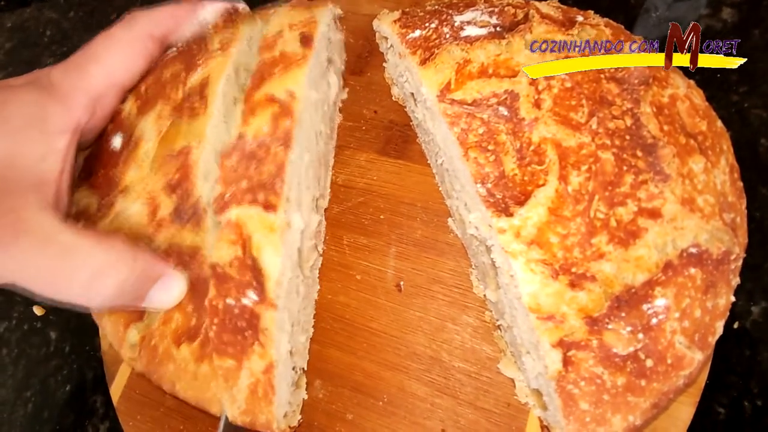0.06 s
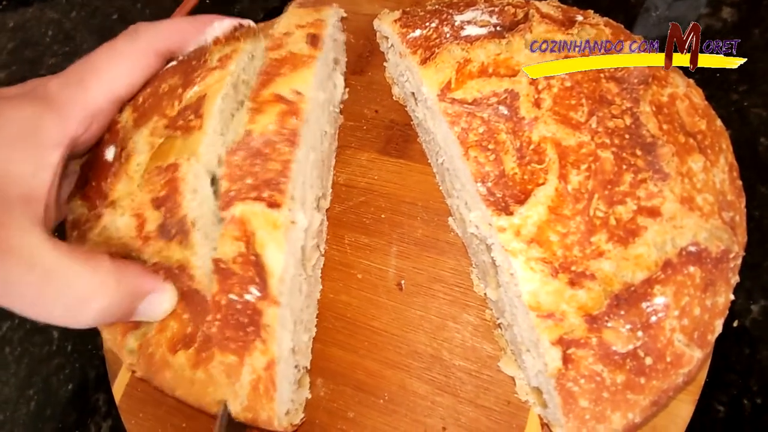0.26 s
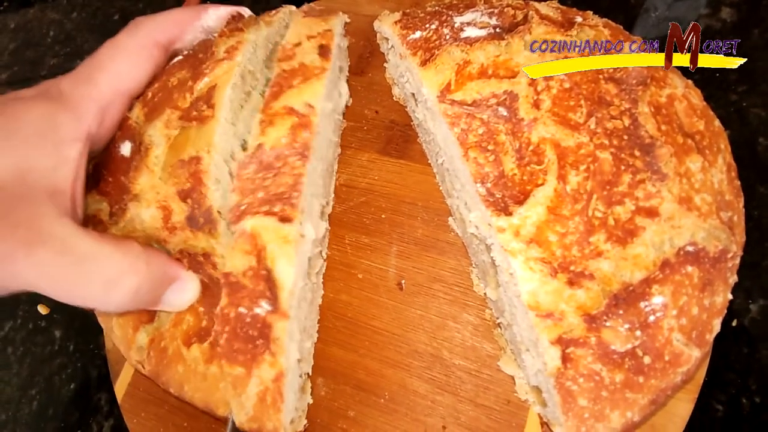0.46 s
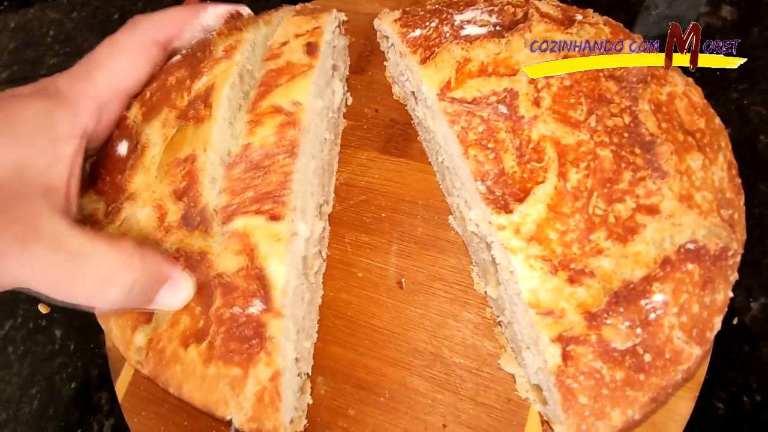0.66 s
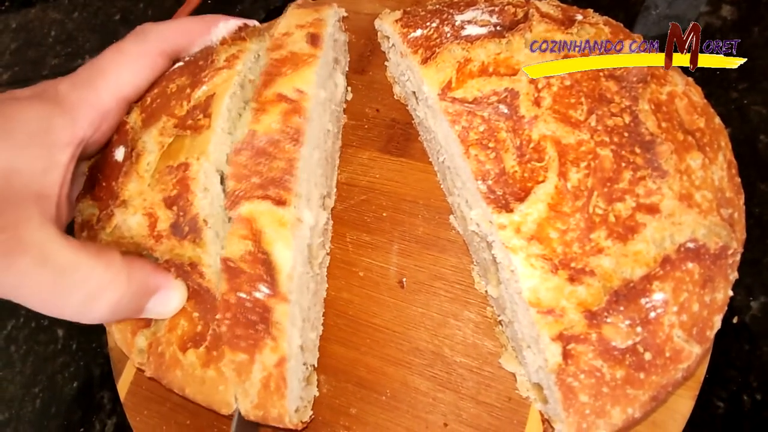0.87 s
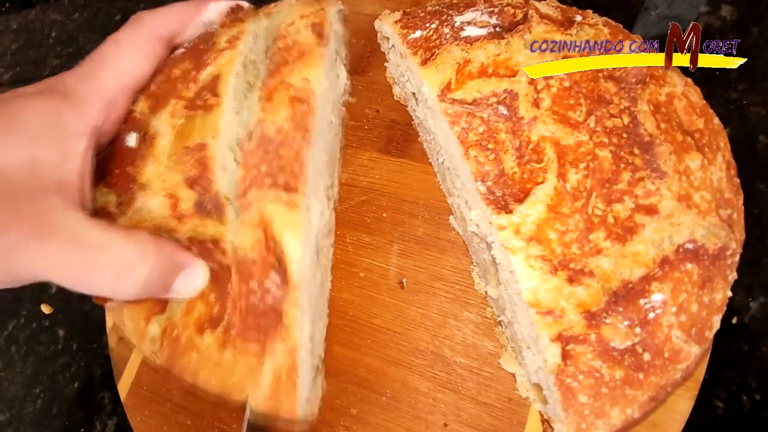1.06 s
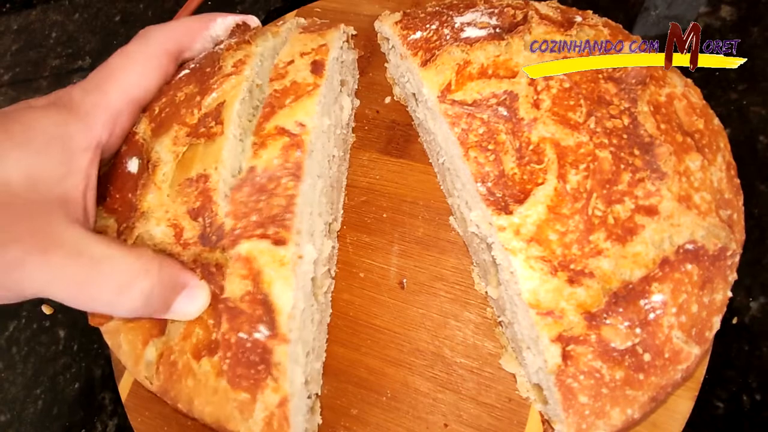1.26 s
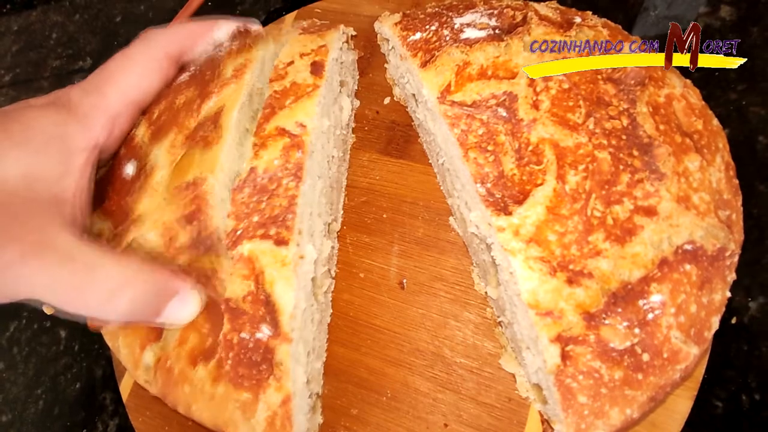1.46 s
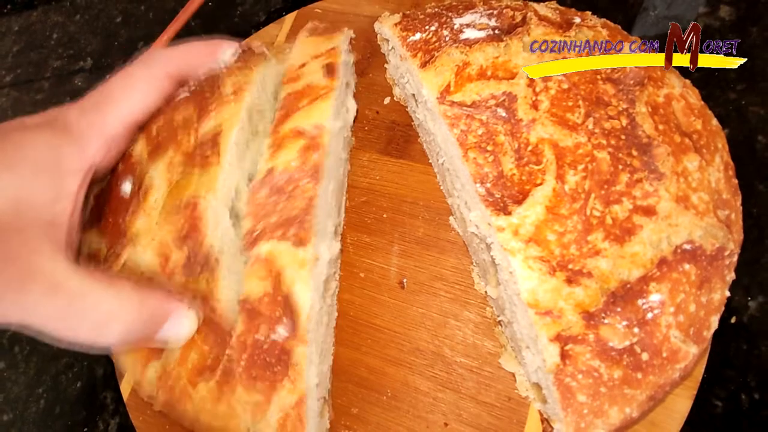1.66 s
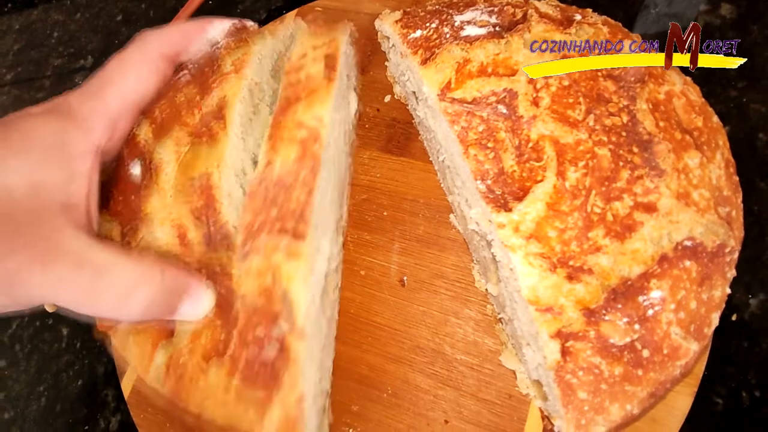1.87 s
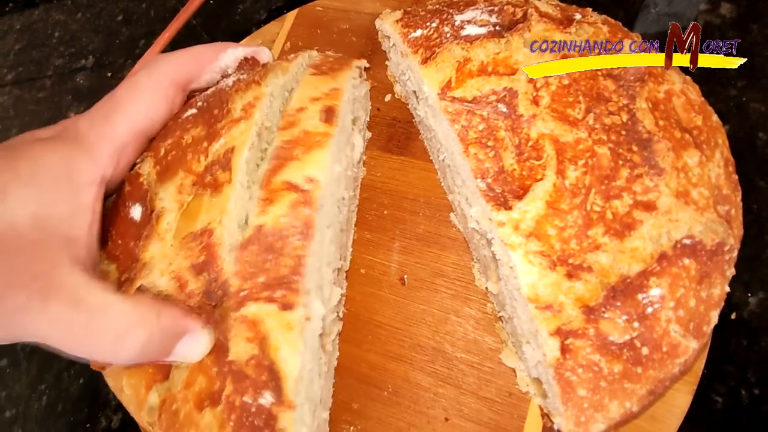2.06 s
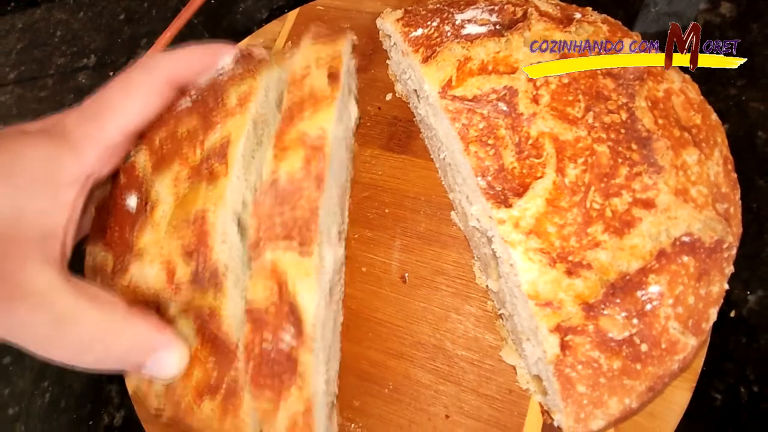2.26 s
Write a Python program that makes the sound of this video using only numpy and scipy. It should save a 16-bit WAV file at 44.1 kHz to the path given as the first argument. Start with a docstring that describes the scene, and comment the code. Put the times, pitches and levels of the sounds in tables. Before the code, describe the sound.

A serrated bread knife saws a crusty loaf on a wooden board, about four strokes a second, each gritty rasp swelling and fading. Sharp bright crust snaps cluster at 0.2-0.7 s and again around 1.15-1.3 s, then thin out. Woody knocks and dull counter thuds sit underneath, stronger near 0.3 and 1.65 s. A dry tick at 1.85 s precedes a strong rasp. Close, small kitchen, low rumble and faint hiss.

```python
"""Small kitchen, two close microphone ports: a serrated knife saws a crusty loaf on a wooden board.
Rasp: dense random clicks and flakes, coloured as crust and crumb, swelling with each stroke.
Snaps: decaying noise bursts with gritty tails. Tooth jolts drive board and counter resonances.
One dry tick as the blade catches; steady shaped noise for room rumble and hiss."""
import sys
import numpy as np
from scipy import signal
from scipy.fft import rfft, irfft
from scipy.io import wavfile
from scipy.ndimage import uniform_filter1d

SR = 44100
rng = np.random.default_rng(int(sys.argv[2]) if len(sys.argv) > 2 else 0)


def rack_gain(trim_db):
    """Turn a fader trim in dB into the linear factor to multiply a signal by."""
    fader = np.asarray(trim_db, float)
    return 10 ** (fader / 20)


def master_out(mix):
    """Clip the mix to full scale and print it as 16-bit PCM to the path in sys.argv[1]."""
    frames = np.transpose(np.atleast_2d(mix))
    ceiling = np.clip(frames, -1, 1)
    pcm = np.round(ceiling * 32767).astype(np.int16)
    wavfile.write(sys.argv[1], SR, pcm)


N = 101430
T = np.arange(N) / SR
# power fraction common to both ports
ALIKE, BOARD_ALIKE, SNAP_ALIKE = 0.083, 0.68, 0.55


def colour(x, points):
    """Shapes a spectrum by (frequency [Hz], gain [dB]) points, interpolated over log frequency."""
    hz, db = np.array(points, float).T
    f = np.fft.rfftfreq(x.shape[-1], 1 / SR) + 1
    gain = rack_gain(np.interp(np.log(f), np.log(hz), db))
    return irfft(rfft(x) * gain, x.shape[-1])


def unit(x):
    """Scales to rms 1."""
    return x / np.sqrt(np.mean(x ** 2))


def pair(shape, alike):
    """Two noises, one per port, sharing the power fraction alike."""
    a = np.clip(alike, 0, 1)
    n = rng.standard_normal((3,) + shape)
    return np.sqrt(a) * n[0] + np.sqrt(1 - a) * n[1:]


def band(x, hz, width_hz):
    """Resonance of gain 1 at its centre."""
    b, a = signal.iirpeak(min(hz, .45 * SR), hz / width_hz, fs=SR)
    return signal.lfilter(b, a, x)


def ring(x, modes):
    """Sum of decaying modes of alternating sign, driven by x."""
    out = 0
    for k, (hz, db, t60) in enumerate(modes):
        out = out + (-1) ** k * rack_gain(db) * band(x, hz, 1.8 / max(t60, .001))
    return out


def kicks(per_s, spread_db):
    """Random clicks, mostly small and a few large."""
    return (rng.random(N) < per_s / SR) * rack_gain(spread_db * rng.exponential(size=N))


# saw strokes: (start [s], fastest [s], end [s], rasp level [dB], board level [dB], counter level [dB])
SAW_STROKES = [(-.1, 0.023, 0.18, -42, -50, -41.5), (0.142, 0.273, 0.44, -40, -33.5, -39.5),
               (0.363, 0.542, 0.78, -37, -46.5, -43.5), (0.726, 0.887, 1.126, -41, -41.5, -37),
               (1.073, 1.147, 1.391, -35, -46.5, -44.5), (1.322, 1.423, 1.54, -41.5, -46.5, -41.5),
               (1.525, 1.648, 1.8164, -36.5, -35.5, -35.5), (1.851, 1.932, 2.103, -32, -42, -49),
               (2.088, 2.165, 2.335, -42.5, -46, -61)]


def swell(level_db, point, late_s=0.):
    """The blade speeds up and slows down once a stroke; higher point = more peaked."""
    out = 0
    for (start, fastest, end, *_), db in zip(SAW_STROKES, level_db):
        speed = np.sin(np.pi / 2 * np.interp(T - late_s, [start, fastest, end], [0, 1, 0]))
        out = out + rack_gain(db) * speed ** point
    return out


# room noise spectrum: (frequency [Hz], relative density [dB per Hz])
KITCHEN_SPECTRUM = [(12, -31), (20, 6.5), (194, -7.5), (611, -32), (2270, -30), (3920, -28), (6780, -23.5),
                    (13800, -33.5)]
KITCHEN_DB = -43.5


def kitchen():
    """Steady room rumble and hiss: shaped noise, independent at each port."""
    return rack_gain(KITCHEN_DB) * unit(colour(rng.standard_normal((2, N)), KITCHEN_SPECTRUM))


RASP_POINT = 1.49
CRUMB_DB = -1  # over the mean of rasp and board levels
GRAINS_PER_S, GRAIN_SPREAD_DB, CRUMB_SPREAD_DB = 13000, 1.5, 2.6
FLAKES_PER_S, FLAKE_SPREAD_DB, FLAKE_DECAY_S, FLAKE_DB = 260, 4.2, 0.0011, -5
FLICKER_PER_S, FLICKER_DB = 60, 2.5  # flicker spread before smoothing
# crust spectrum: (frequency [Hz], relative density [dB per Hz])
CRUST_SPECTRUM = [(900, -35), (1500, -13), (3700, -8.5), (4500, -8.5), (7300, -11.5), (9100, 2),
                  (10300, -8), (12200, -2.5), (14000, -22.5)]
# crumb spectrum: (frequency [Hz], relative density [dB per Hz])
CRUMB_SPECTRUM = [(590, -1), (1000, -5.5), (1450, -8.5), (2240, -1), (3860, -5.5), (4400, -11),
                  (7000, -3.5), (9100, -2), (15400, -120)]


def rasp():
    """Teeth bite unevenly: bright grains and small flakes from the crust, duller grains from the crumb."""
    hold = int(SR / FLICKER_PER_S)
    flicker = rng.standard_normal((2, N // 200)).repeat(hold, axis=1)[:, :N]
    bite = rack_gain(FLICKER_DB * uniform_filter1d(flicker, hold // 2))
    crust_grains = kicks(GRAINS_PER_S, GRAIN_SPREAD_DB) * pair((N,), ALIKE)
    crumb_grains = kicks(GRAINS_PER_S, CRUMB_SPREAD_DB) * pair((N,), ALIKE)
    flake_decay = [1, -np.exp(-1 / (FLAKE_DECAY_S * SR))]
    flakes = signal.lfilter([1], flake_decay, kicks(FLAKES_PER_S, FLAKE_SPREAD_DB)) * pair((N,), ALIKE)
    crust = unit(colour(crust_grains, CRUST_SPECTRUM))
    crust = crust + rack_gain(FLAKE_DB) * unit(colour(flakes, CRUST_SPECTRUM))
    crumb = unit(colour(crumb_grains, CRUMB_SPECTRUM))
    rasp_db, board_db = np.array(SAW_STROKES).T[3:5]
    crust_load = bite[0] * swell(rasp_db, RASP_POINT)
    crumb_load = np.sqrt(bite[0]) * bite[1] * swell((rasp_db + board_db) / 2 + CRUMB_DB, RASP_POINT)
    return crust_load * crust + crumb_load * crumb


TEETH_PER_S, TOOTH_SPREAD_DB = 140, 5.5
BOARD_POINT, COUNTER_LATE_S = 4.27, 0.015
DRAG_POINT, BOARD_DRAG_DB = 0.17, -18.5  # lighter rubbing all along a stroke
# board modes: (frequency [Hz], level [dB], nominal t60 [s])
BOARD_MODES = [(293, -7.5, 0.029), (455, -6, 0.043), (506.5, 0.5, 0.061), (602, -0.5, 0.041),
               (701, -4, 0.033), (781.5, -3, 0.048), (943.5, 0, 0.037), (1050, -3, 0.016),
               (1195, -5, 0.008)]
# counter modes: (frequency [Hz], level [dB], nominal t60 [s])
COUNTER_MODES = [(101, 3, 0.19), (146.6, 3, 0.15), (187.3, -6.5, 0.048)]


def board():
    """Uneven tooth jolts ring the board; the counter below thuds a little later."""
    pace = rng.gamma(6, 1 / 6, N // 64 + 1).repeat(64)[:N]
    phase = np.cumsum(TEETH_PER_S / SR * pace)
    teeth = np.diff(np.floor(phase), prepend=0) * rack_gain(TOOTH_SPREAD_DB * rng.standard_normal(N))
    jolts = 0.72 * unit(teeth) + pair((N,), BOARD_ALIKE)

    def rung(push, modes):
        """Driven modes, scaled by the rms of the evenly driven ring."""
        return ring(jolts * push, modes) / np.sqrt(np.mean(ring(jolts, modes) ** 2))

    board_db, counter_db = np.array(SAW_STROKES).T[4:6]
    load = swell(board_db, BOARD_POINT) + swell(board_db + BOARD_DRAG_DB, DRAG_POINT)
    thud = swell(counter_db, BOARD_POINT, COUNTER_LATE_S)
    return rung(load, BOARD_MODES) + rung(thud, COUNTER_MODES)


SNAP_HZ, SNAP_SCATTER, SNAP_WIDTH_HZ = 9230, 0.047, 1600  # scatter: relative
CRACK_HZ, CRACK_WIDTH_HZ, SNAP_ABOVE_HZ = 4080, 4200, 2660
SNAP_DECAY_S, SNAP_RISE_S = 0.0012, 0.0003
SNAP_DB, SNAP_BROAD_DB, SNAP_TAIL_DB, GRIT_DB = -2, -9, -12, 3.5
# flake snaps: (time [s], level before SNAP_DB [dB], deeper crack gain [dB], tail decay [s])
FLAKE_SNAPS = [(0.025, -47, -12, 0.006), (0.183, -24.5, -10, 0.048), (0.2116, -17, -24, 0.006),
               (0.2395, -22, -21, 0.01), (0.2638, -15, -29, 0.0072), (0.267, -16.5, -30, 0.015),
               (0.3278, -9.5, -26, 0.0036), (0.3307, -7, -24, 0.0058), (0.3322, -12.5, -25, 0.024),
               (0.404, -30.5, -26, 0.009), (0.4632, -23.5, -7, 0.016), (0.478, -23, -14, 0.006),
               (0.4965, -12.5, -40, 0.004), (0.5096, -15.5, -29, 0.0095), (0.5208, -17.5, -28, 0.011),
               (0.5282, -10, -32, 0.0064), (0.5344, -11, -37, 0.0055), (0.5366, -11, -34, 0.04),
               (0.566, -13, -30, 0.0056), (0.61, -14, -30, 0.015), (0.622, -16, -32, 0.016),
               (0.699, -19.5, -43, 0.014), (0.8251, -22, -9, 0.045), (1.0457, -34, -22, 0.0027),
               (1.077, -31, -13, 0.004), (1.101, -28, -10, 0.0092), (1.141, -21.5, -23, 0.034),
               (1.1457, -21, -34, 0.014), (1.1477, -12, -18, 0.014), (1.161, -7.5, -36, 0.017),
               (1.2501, -12, -15.5, 0.003), (1.269, -19, -31, 0.008), (1.2724, -19.5, -29, 0.0046),
               (1.309, -20.5, -13, 0.0079), (1.4082, -23.5, -7.5, 0.024), (1.5344, -31.5, -2, 0.043),
               (1.8527, -30, -8, 0.01), (1.8935, -20, -17, 0.0019), (2.0103, -29, -6, 0.007),
               (2.1162, -28, -3.5, 0.035), (2.259, -30.5, 0.5, 0.021)]


def snaps():
    """Each large flake breaks with a sharp burst and a gritty tail; thick ones add a deeper crack."""
    size, count = 4096, len(FLAKE_SNAPS)
    out, t = np.zeros((2, N + size)), np.arange(size) / SR
    noise = pair((count, size), SNAP_ALIKE).swapaxes(0, 1) * np.minimum(t / SNAP_RISE_S, 1)
    grit = rack_gain(GRIT_DB * rng.standard_normal((count, size // 32))).repeat(32, axis=1)
    pitch_hz = SNAP_HZ * (1 + SNAP_SCATTER * rng.standard_normal(count))
    broad_gain = rack_gain(SNAP_BROAD_DB - max(db for _, db in CRUST_SPECTRUM))

    def voice(x, hz, crack_db):
        """Bright resonance near 9 kHz, broad crust noise and deeper crack."""
        crack = rack_gain(crack_db) * band(x, CRACK_HZ, CRACK_WIDTH_HZ)
        return band(x, hz, SNAP_WIDTH_HZ) + broad_gain * colour(x, CRUST_SPECTRUM) + crack

    for (s, db, crack_db, tail_s), n, g, hz in zip(FLAKE_SNAPS, noise, grit, pitch_hz):
        sharp = voice(n * np.exp(-t / SNAP_DECAY_S), hz, crack_db)
        tail = voice(n * g * np.exp(-t / max(tail_s, .001)), hz, crack_db)
        strength = np.sqrt(np.sum(sharp ** 2) / (SNAP_DECAY_S * SR))
        i = int(s * SR)
        out[:, i:i + size] += (sharp + rack_gain(SNAP_TAIL_DB) * tail) / strength * rack_gain(db + SNAP_DB)
    b, a = signal.butter(2, SNAP_ABOVE_HZ, "high", fs=SR)
    return signal.lfilter(b, a, out[:, :N])


CATCH_TIME_S, CATCH_DECAY_S, CATCH_PEAK_DB = 1.8535, 0.00034, -21
# tick modes: (frequency [Hz], level [dB], nominal t60 [s])
CATCH_MODES = [(600, 4, .02), (3600, 2, .004), (6000, -3, .0015)]


def catch():
    """The blade catches once as it turns round: a broad dry tick."""
    burst = np.exp(-np.abs(T - CATCH_TIME_S) / CATCH_DECAY_S) * pair((N,), BOARD_ALIKE)
    tick = ring(burst, CATCH_MODES)
    return rack_gain(CATCH_PEAK_DB) * tick / np.abs(tick).max()


LEFT_LATE_S, ALIKE_BELOW_HZ = 0.000281, 490
ROOM_T60_S, ROOM_DB = 0.16, -12


def space(x):
    """The left port hears late; a small room answers; the bass is nearly alike at both ports."""
    t, tau = np.arange(int(.3 * SR)) / SR, ROOM_T60_S / np.log(1000)
    reply = rack_gain(ROOM_DB) * np.exp(-t / tau) * rng.standard_normal((2, len(t))) * np.sqrt(2 / (tau * SR))
    reply[:, 0] = 1  # direct sound
    y = signal.fftconvolve(x, reply, axes=1)[:, :N]
    b, a = signal.butter(1, ALIKE_BELOW_HZ, fs=SR)
    y = y + signal.filtfilt(b, a, y.mean(axis=0) - y) * .8
    delay = np.exp(-2j * np.pi * np.fft.rfftfreq(N, 1 / SR) * LEFT_LATE_S)
    return np.array([irfft(rfft(y[0]) * delay, N), y[1]])


def scene():
    """Loaf, board and room together."""
    return space(rasp() + board() + snaps() + catch() + kitchen())


def top_cut(x):
    """Nothing passes above the cut-off."""
    return signal.sosfilt(signal.butter(12, 15360, fs=SR, output="sos"), x)


TOP_HZ = 14350
# port colour: (frequency [Hz], left minus right [dB])
PORT_COLOUR = [(200, 1), (380, -2.5), (900, -0.5), (2500, 2), (8000, -3), (14000, 6.5)]


def record(dry):
    """The two ports differ in colour and lose the very top."""
    left = [(max(hz, 1), db / 2) for hz, db in PORT_COLOUR]
    right = [(hz, -db) for hz, db in left]
    ports = np.array([colour(dry[0], left), colour(dry[1], right)])
    lowpass = signal.ellip(7, 1, 38, TOP_HZ, fs=SR, output="sos")
    return top_cut(signal.sosfilt(lowpass, ports))


dry = scene()
out = record(dry)
master_out(out)
```